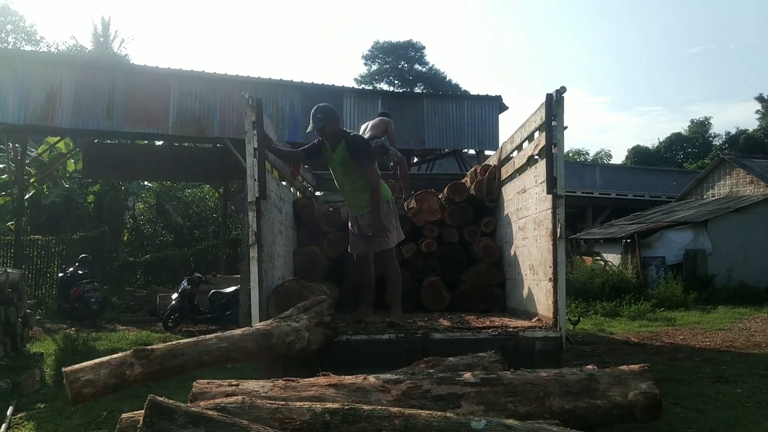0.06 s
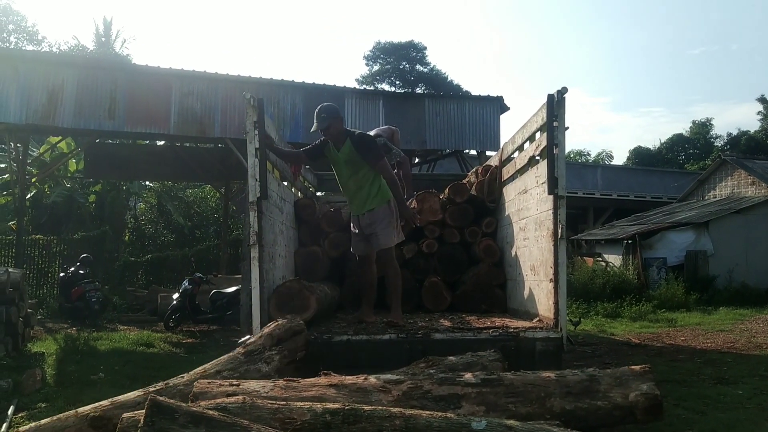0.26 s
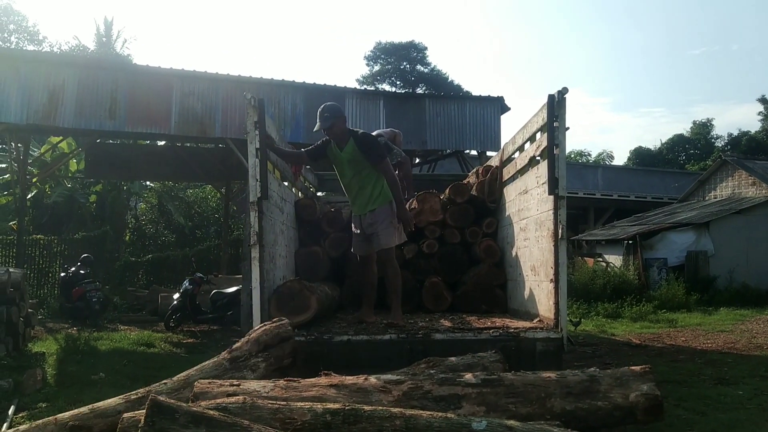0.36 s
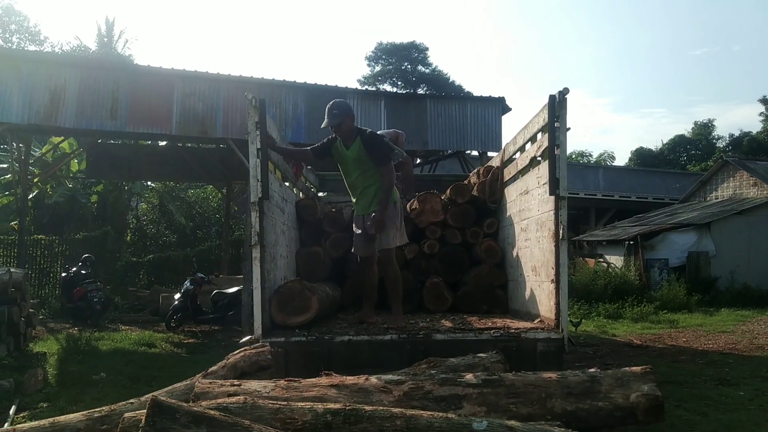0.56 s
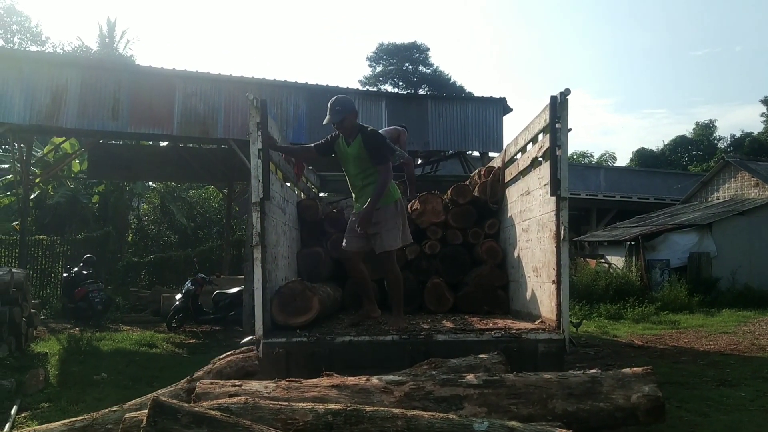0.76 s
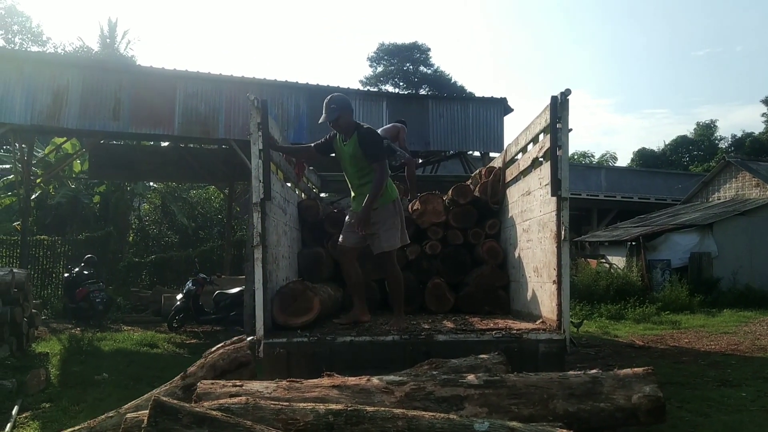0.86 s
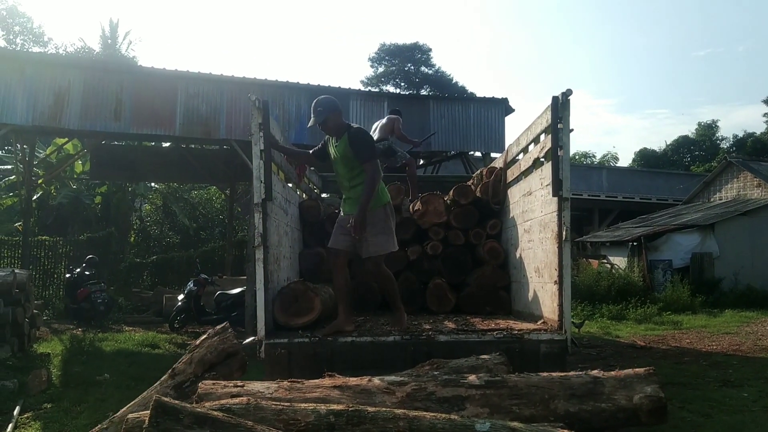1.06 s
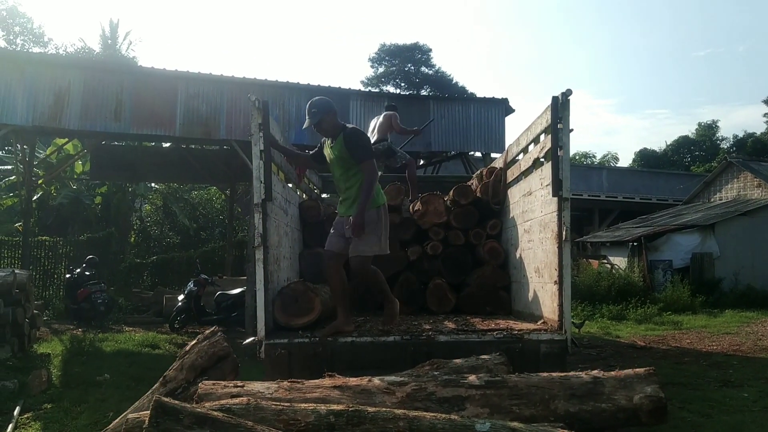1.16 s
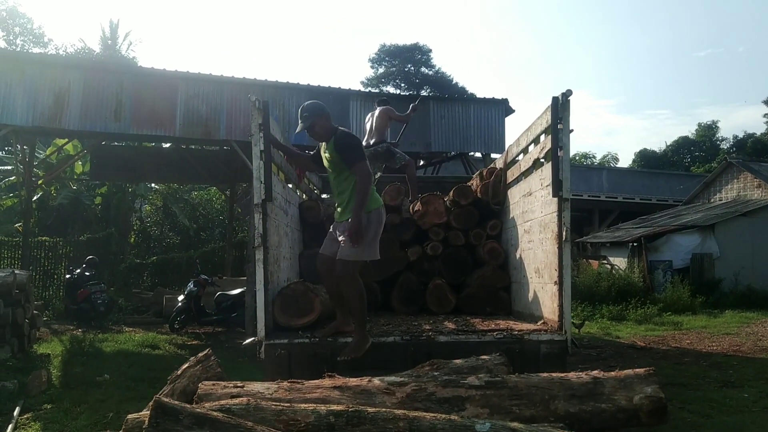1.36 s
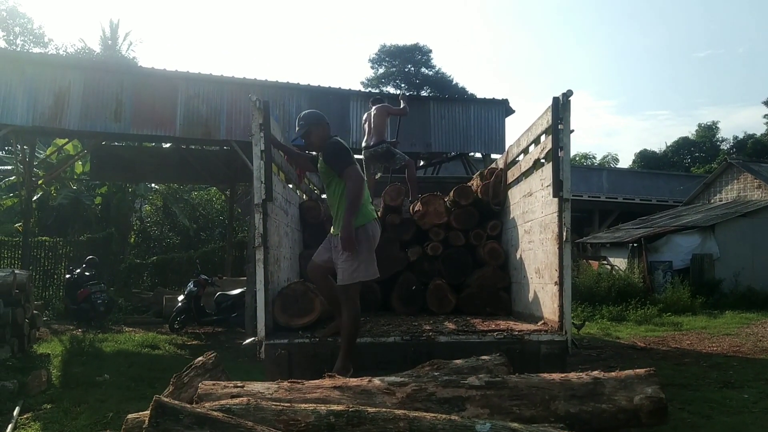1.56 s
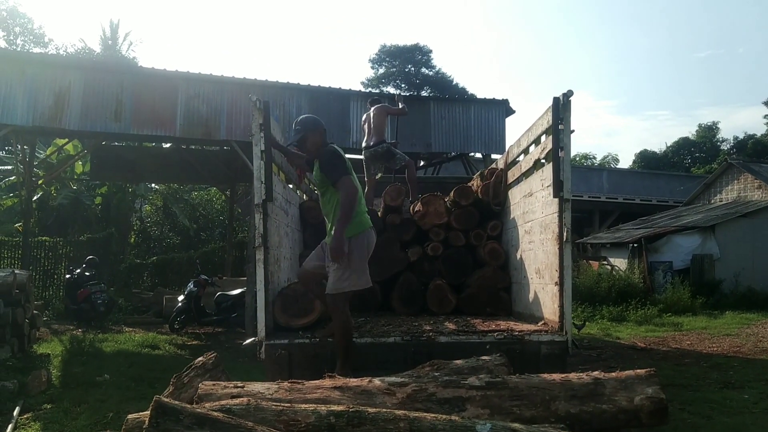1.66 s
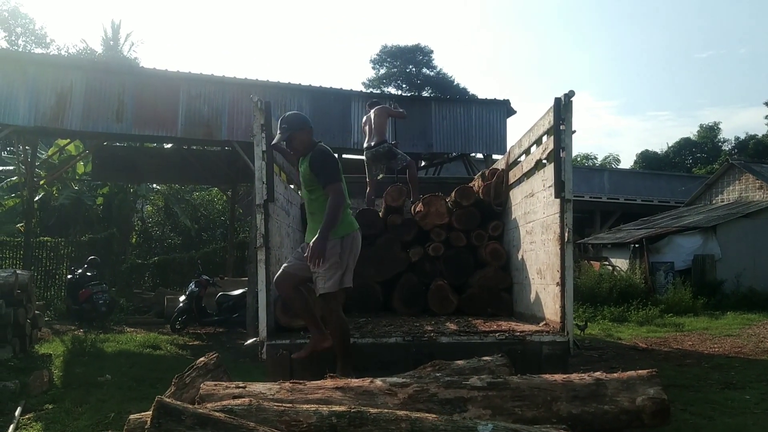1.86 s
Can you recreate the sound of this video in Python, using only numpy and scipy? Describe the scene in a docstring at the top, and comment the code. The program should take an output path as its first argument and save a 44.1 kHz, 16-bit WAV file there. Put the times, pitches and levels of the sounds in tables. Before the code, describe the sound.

A heavy log lands on a woodpile outdoors. A faint scuff at 0.1 s, then at 0.2 s a loud, dry bark crack, clustered wooden knocks and a deep thud, with splintery bits to 0.3 s and a short scattered echo. Soft low bumps settle from 0.4 to 0.7 s. Quiet foot scuffs follow, with a gritty snap at 1.3 s, over low distant engine hum, airy hiss and thin insect shrilling until about 1.9 s.

```python
"""A distant engine hums as harmonics of its firing rate, over rumble, hiss and shrilling insects of filtered noise.
Feet scuff on the truck bed as puffs of noise; then a heavy log drops from it: bark cracks in bursts of noise,
and the log knocks against the pile and thuds into the ground, each blow exciting decaying modes.
Sheds around the yard throw the blows back as sparse reflections that die away band by band.
The log settles with low knocks; more scuffs and small snaps of grit follow over the same background."""
import sys
import numpy as np
from scipy import signal
from scipy.fft import rfft, irfft
from scipy.io import wavfile
from scipy.ndimage import uniform_filter1d

SR = 44100
rng = np.random.default_rng(int(sys.argv[2]) if len(sys.argv) > 2 else 0)


def elevation(decibels):
    """Turn decibel levels (scalar or array-like) into linear amplitude ratios."""
    levels = np.asarray(decibels, float)
    return 10 ** (levels / 20)


def unload_audio(sound):
    """Save the sound as a 16-bit wav file, at the path given as the first command line argument."""
    columns = np.transpose(np.atleast_2d(sound))
    # keep every value between -1 and 1, then stretch to whole-number steps
    steps = np.round(np.clip(columns, -1, 1) * 32767)
    wavfile.write(sys.argv[1], SR, steps.astype(np.int16))


N = 83790  # length in samples


def evened(x):
    """Normalisation: scales a signal to unit rms."""
    return x / np.sqrt(np.mean(x ** 2) + 1e-20)


def read(points, hz):
    """Linear interpolation of a table over logarithmic frequency."""
    f, value = np.transpose(points)
    return np.interp(np.log(hz + 1), np.log(f + 1), value)


def add(mix, s, sound):
    """Superposition: adds a sound to the mix from a given second."""
    part = mix[..., round(s * SR):][..., :sound.shape[-1]]
    part += sound[..., :part.shape[-1]]


def slow(hz):
    """Low-pass filtered noise: a random drift of unit rms up to a given rate."""
    z = rfft(rng.standard_normal(N))
    return evened(irfft(z / (1 + (np.fft.rfftfreq(N, 1 / SR) / hz) ** 4), N))


# Coherence of noise at the two ports. Each row: frequency in Hz, left-right likeness from 0 to 1.
COHERENCE = [(60, 1), (300, 0.87), (700, 0.67), (1400, 0.17), (3000, 0.13), (6000, 0.1), (15000, 0.39)]


def coherent_pair(a, b, hz):
    """Partial coherence: the right spectrum shares a set part of the left, the rest being independent."""
    same = np.clip(read(COHERENCE, hz), 0, 1)
    return np.array([a, same * a + np.sqrt(1 - same ** 2) * b])


# Colour of the background noise. Each row: frequency in Hz, relative spectral level in dB.
AIR_COLOUR = [(20, -40.5), (40, -0.5), (60, 0.5), (120, 0), (200, -7), (300, -19.5), (372, -18),
              (645, -28.5), (800, -24), (1280, -32.5), (1750, -32.5), (2790, -27.5), (4230, -28),
              (5250, -30), (7500, -30.5), (10600, -34.5), (12300, -38.5), (14000, -43.5), (16000, -46)]
# Swell of its bass. Each row: time in seconds, relative level in dB.
RUMBLE_SWELL = [(0, -4), (.4, 4.5), (.75, -1.5), (.9, -4.5), (1.2, -2), (1.5, -2.5), (1.9, -4)]
# Swell of its treble. Each row: time in seconds, relative level in dB.
RUSTLE_SWELL = [(0, -2.5), (.45, 1), (.8, 1.5), (1, -1), (1.3, 1.5), (1.6, -1), (1.9, -2)]
AIR_DB, PATCH_DB = -45, 1.5  # rms level of the whole; rms unevenness over time and frequency


def air():
    """Shaped Gaussian noise: rumble and hiss whose bass and treble swell separately."""
    frames, hz = N // 256 + 5, np.fft.rfftfreq(1024, 1 / SR)[:, None]
    a, b, c, d, patches = rng.standard_normal((frames, 513, 5)).T
    patches = uniform_filter1d(patches, size=10, axis=0)
    patches = evened(uniform_filter1d(patches, size=10, axis=1))
    spectra = coherent_pair(a + 1j * b, c + 1j * d, hz)
    t = np.arange(frames) * 256 / SR
    low = 1 / (1 + (hz / 400) ** 2)  # share of the bass swell, one half at 400 Hz
    bass_db = low * np.interp(t, *np.transpose(RUMBLE_SWELL))
    treble_db = (1 - low) * np.interp(t, *np.transpose(RUSTLE_SWELL))
    gain = elevation(read(AIR_COLOUR, hz) + PATCH_DB * patches + bass_db + treble_db)
    wash = signal.istft(spectra * gain, nperseg=1024, noverlap=768)[1][:, :N]
    return elevation(AIR_DB) * evened(wash)


# Insect bands. Each row: centre in Hz, width in Hz (two standard deviations), rms level in dB.
INSECT_BANDS = [(4486, 150, -68.5), (4680, 270, -62), (4793, 36, -64)]
THROB_DB, THROB_HZ = 2, 60.7  # rms depth and upper rate of the random throbbing


def insects():
    """Amplitude modulation: narrow bands of noise throb irregularly."""
    f, bugs = np.fft.rfftfreq(N, 1 / SR), 0
    for centre_hz, width_hz, db in INSECT_BANDS:
        bell = np.exp(-.5 * ((f - centre_hz) / width_hz * 2) ** 2)
        band = irfft(rfft(rng.standard_normal(N)) * bell, N)
        bugs = bugs + elevation(db) * evened(band * elevation(THROB_DB * slow(THROB_HZ)))
    return bugs


# Engine. Each row: time in seconds, firing rate in Hz, then the rms levels of orders 1 to 4 in dB.
ENGINE_ORDERS = [(0, 69.46, -48.5, -48, -60, -64), (0.178, 67.85, -41.5, -43, -51.5, -47),
                 (0.498, 65.2, -40.5, -52.5, -52.5, -60), (0.698, 63.86, -46, -47, -52, -55.5),
                 (.95, 61.83, -50.5, -57, -58.5, -58.5), (1.1, 61.95, -44, -48, -46.5, -59),
                 (1.5, 62.56, -52, -45, -52, -62.5), (1.621, 61.9, -48.5, -55.5, -55, -56),
                 (1.75, 64.6, -55, -52, -49, -52.5), (1.9, 66.04, -49, -54, -48.5, -75)]
WAVER_DB, WAVER_HZ = 1.5, 6  # rms depth and upper rate of each order's wavering


def engine():
    """Harmonic synthesis: four wavering orders of the firing rate, in step so that each firing throbs."""
    t = np.arange(N) / SR
    times, firing_hz, *orders = np.array(ENGINE_ORDERS).T
    turns = np.cumsum(np.interp(t, times, firing_hz)) / SR
    hum = 0
    for order, db in enumerate(orders, 1):
        level_db = np.interp(t, times, db) + WAVER_DB * slow(WAVER_HZ)
        hum = hum + np.sqrt(2) * elevation(level_db) * np.cos(2 * np.pi * order * turns)
    return hum


def bursts(rows, rise_s):
    """Band-filtered noise under a decaying envelope: gritty puffs, at most 0.19 s long."""
    out, t, f = np.zeros((2, N)), np.arange(8192) / SR, np.fft.rfftfreq(8192, 1 / SR) + 1
    for s, db, t60, hz, octaves in rows:
        a, b, roughness = rng.standard_normal((3, 8192))
        roughness_db = 1.5 * evened(uniform_filter1d(roughness, size=24))
        a, b = rfft(np.array([a, b]) * elevation(roughness_db))
        bell = np.exp(-.5 * (np.log2(f / hz) / octaves * 2) ** 2)
        grit = evened(irfft(coherent_pair(a, b, f) * bell))
        add(out, s, grit * np.minimum(t / rise_s, 1) * elevation(db - 60 * t / t60))
    return out


# Feet and bark scuffing. Each row: start in seconds, level in dB, 60 dB decay time in seconds,
# centre in Hz, width in octaves (two standard deviations).
SCUFF_ROWS = [(.08, -45.5, 0.081, 9000, 1.8), (.085, -55, 0.16, 805, 1.3), (.09, -54, 0.085, 2120, 0.45),
              (.395, -58, .1, 6000, 7.5), (.64, -56, 0.18, 700, 0.37), (.64, -52.5, 0.18, 5800, 2.06),
              (.765, -46, 0.1, 3150, 3), (1.06, -65, 0.14, 770, 0.47), (1.3, -52.5, .12, 4000, 4.1),
              (1.46, -50, 0.09, 1534, 2.3), (1.69, -56.5, 0.25, 10000, 1.3)]


def scuffs():
    """Friction noise: feet and bark rub in puffs of gentle onset."""
    return bursts(SCUFF_ROWS, rise_s=0.0039)


# Grit snapping underfoot. Each row: start in seconds, level in dB, 60 dB decay time in seconds,
# centre in Hz, width in octaves (two standard deviations).
TICK_ROWS = [(.08, -51, .02, 9000, 1.8), (1.3135, -40.5, 0.022, 7000, 3.4), (1.42, -50, 0.011, 9000, 1.5)]


def ticks():
    """Impulsive noise: grit snaps underfoot with a fast onset and short decay."""
    return bursts(TICK_ROWS, rise_s=.0006)


# Bark cracks and splinters. Each row: start in seconds, level in dB, 60 dB decay time in seconds,
# centre in Hz, width in octaves (two standard deviations).
CRACK_ROWS = [(.188, -20, 0.052, 4750, 1.9), (.1898, -17, 0.04, 1740, 0.64), (.1905, -23, 0.038, 2650, 0.2),
              (.1955, -20.5, 0.023, 4930, 4.8), (.2158, -21.5, 0.036, 3700, 2.1),
              (.2215, -48, 0.05, 6080, 3.7), (.24, -49, 1, 4000, 2.7), (.225, -40.5, 0.38, 1300, 1.24),
              (.232, -36, 0.33, 715, 0.79), (.2675, -32, 0.051, 2780, 0.85), (.294, -41, 0.055, 2320, 1.7),
              (.318, -36, 0.047, 2230, .7)]


def cracks():
    """Fracture noise: bark and splinters break in sharp bursts."""
    return bursts(CRACK_ROWS, rise_s=0.0012)


def struck(modes, blows):
    """Modal synthesis: half-sine pushes convolved with one set of exponentially decaying modes."""
    force, t = np.zeros(N), np.arange(SR // 2) / SR
    for s, db, contact in blows:
        push = np.sin(np.pi * np.arange(.5, contact * SR) / (contact * SR))
        add(force, s, elevation(db) * push / push.sum())  # the level sets the area of the push
    ring = sum(elevation(db - 60 * t / t60) * np.sin(2 * np.pi * hz * t) for hz, db, t60 in modes)
    return -signal.fftconvolve(force, ring)[:N]


# Modes of the logs in the pile. Each row: frequency in Hz, level in dB, 60 dB decay time in seconds.
PILE_MODES = [(381.5, -6, 0.024), (584, -34.5, 0.026), (633, -16.5, 0.1), (680, -13.5, 0.058),
              (810, 1, 0.015), (905, -13, 0.041), (985, -20, .04)]
# Knocks on the pile. Each row: start in seconds, force level in dB, contact time in seconds.
KNOCK_BLOWS = [(.191, -16, 0.00023), (0.196, -16, 0.0001), (.2181, -11.5, 0.00046), (.2206, -7, 0.00049),
               (0.2268, -20.5, 0.00022), (.231, -24.5, 0.00034)]


def knocks():
    """Impact excitation: very short contacts excite the higher modes of the piled logs."""
    return struck(PILE_MODES, KNOCK_BLOWS)


# Modes of the falling log. Each row: frequency in Hz, level in dB, 60 dB decay time in seconds.
LOG_MODES = [(94.8, 1.5, 0.091), (121.8, -3.5, 0.36), (199, -0.5, 0.15), (241, -12.5, 0.53),
             (280, -24, 0.18)]
# Blows of the log. Each row: start in seconds, force level in dB, contact time in seconds.
THUD_BLOWS = [(.197, -3.5, 0.0071), (0.207, -8, 0.0044), (.23, -10, 0.0023), (0.254, -19.5, 0.0016),
              (.381, -32, 0.0023)]


def thuds():
    """Impact excitation: longer contacts favour the low modes of the heavy log."""
    return struck(LOG_MODES, THUD_BLOWS)


# Band decay of the yard. Each row: frequency in Hz, 60 dB decay time in seconds.
ECHO_DECAY = [(80, 1), (250, 0.63), (800, 0.42), (2500, 0.46), (6000, 0.42), (12000, 0.29)]


def yard(x):
    """Reverberation: sparse random reflections from the sheds, each band dying at its own speed."""
    taps = np.zeros((2, SR))
    slots = np.arange(0, SR - 20, 20)  # one reflection in every 20 samples
    at = slots + rng.integers(0, 20, (2, len(slots)))
    np.put_along_axis(taps, at, rng.choice([-1., 1.], at.shape), 1)
    hz, t, z = signal.stft(taps, SR, nperseg=512)
    apart = np.clip(hz / 1000, 0, 1)[:, None]  # the ports are alike in the bass, independent above 1 kHz
    z[1] = apart * z[1] + np.sqrt(1 - apart ** 2) * z[0]
    decay = elevation(-60 * t / read(ECHO_DECAY, hz)[:, None])
    tail = signal.istft(z * decay, SR, nperseg=512)[1]
    tail = np.pad(tail, ((0, 0), (round(0.011 * SR), 0)))  # first reflections no sooner than 11 ms
    return signal.fftconvolve(x, tail / np.linalg.norm(tail[0]), axes=1)[:, :N]


# Mode of the ground. Each row: frequency in Hz, level in dB, 60 dB decay time in seconds.
GROUND_MODES = [(72, 0, .07)]
# The log rocking to rest. Each row: start in seconds, force level in dB, contact time in seconds.
SETTLE_BLOWS = [(0.435, -22, 0.0069), (.503, -31.5, .005), (0.527, -25, 0.0069), (.697, -23, 0.0037)]


def settles():
    """Impact excitation: the log rocks to rest on one strongly damped low mode of the ground."""
    return struck(GROUND_MODES, SETTLE_BLOWS)


LAG_S, LAG_FROM_HZ, BASS_LAG_SHARE = 0.0003867, 950, .2  # treble lag, turnover, share left in the bass


def ports(x, lean):
    """Interaural-type differences: the left port lags, far less in the bass, and balance varies with pitch."""
    hz = np.fft.rfftfreq(N, 1 / SR)
    lag = LAG_S * (BASS_LAG_SHARE + (1 - BASS_LAG_SHARE) / (1 + (LAG_FROM_HZ / (hz + 1)) ** 3))
    half = elevation(read(lean, hz) / 2) * np.exp(-1j * np.pi * hz * lag)
    return irfft(rfft(x * np.ones((2, 1))) * np.array([half, 1 / half]), N)


# Balance of the background and echoes. Each row: frequency in Hz, left over right in dB.
BACKGROUND_LEAN = [(300, 0.5), (1000, 1), (2000, 7), (5000, 5), (9000, 0.5)]
# Balance of the direct blows and scuffs. Each row: frequency in Hz, left over right in dB.
DIRECT_LEAN = [(600, 0), (1100, 3), (1800, 5), (3000, 1), (5000, -3), (10000, -7), (15000, -5)]
ECHO_DB, ECHO_LOW_DB = -14, -24.5  # echo of the sharp sounds, echo of the thuds


def scene():
    """Superposition: direct sounds and their reflections over the steady background."""
    background = air() + insects() + engine()
    underfoot = scuffs() + ticks()
    sharp = cracks() + knocks()
    thud = thuds() + settles()
    echoes = yard(elevation(ECHO_DB) * sharp + elevation(ECHO_LOW_DB) * thud)
    return ports(thud + sharp + underfoot, DIRECT_LEAN) + ports(echoes + background, BACKGROUND_LEAN)


def band_limit(x):
    """A steep low-pass at the top of the band."""
    return signal.sosfilt(signal.butter(12, 16470, fs=SR, output="sos"), x)


KNEE_DB, RATIO, RECOVER_DB_PER_S = -9, 1.4, 64  # the detected level recovers at this rate


def record(dry):
    """Band limiting and compression: the gain falls when the power passes the knee, then recovers."""
    low_cut = signal.butter(4, 60, "high", fs=SR, output="sos")
    high_cut = signal.cheby2(12, 50, 16400, fs=SR, output="sos")  # 16400 Hz is the stopband edge
    mic = signal.sosfilt(low_cut, dry)
    mic = signal.sosfiltfilt(high_cut, mic)
    power = uniform_filter1d((mic ** 2).mean(0), size=400)
    power_db = 10 * np.log10(abs(power) + 1e-12)
    fall = np.arange(N) * RECOVER_DB_PER_S / SR
    held_db = np.maximum.accumulate(power_db + fall) - fall
    over_db = np.maximum(held_db - KNEE_DB, 0)
    cut_db = (1 - 1 / RATIO) * uniform_filter1d(over_db, size=200)
    return band_limit(mic / elevation(cut_db))


dry = scene()
out = record(dry)
unload_audio(out)
```